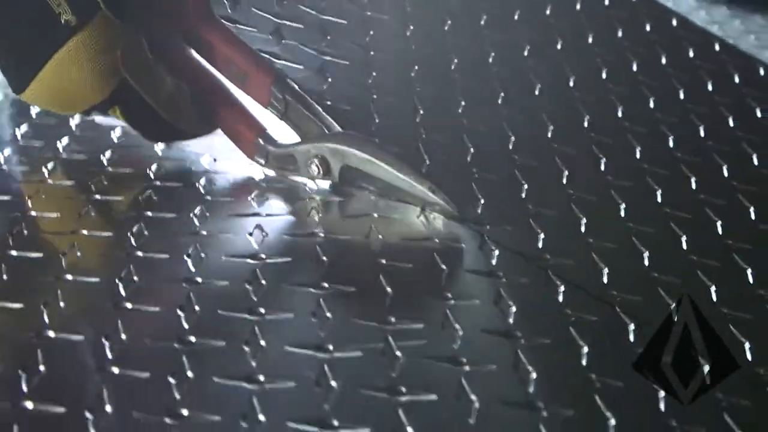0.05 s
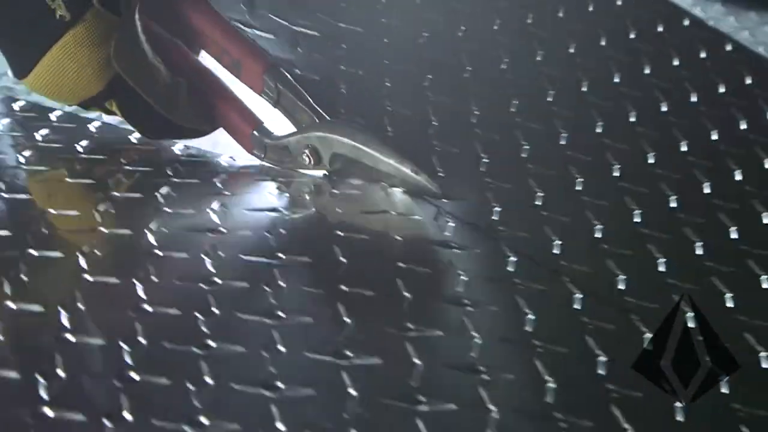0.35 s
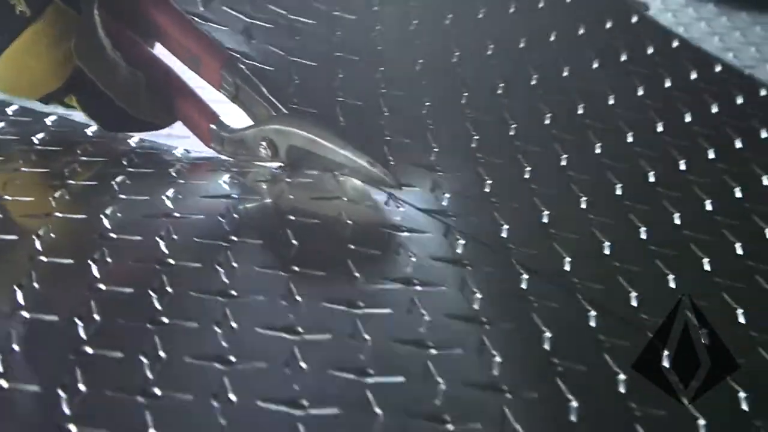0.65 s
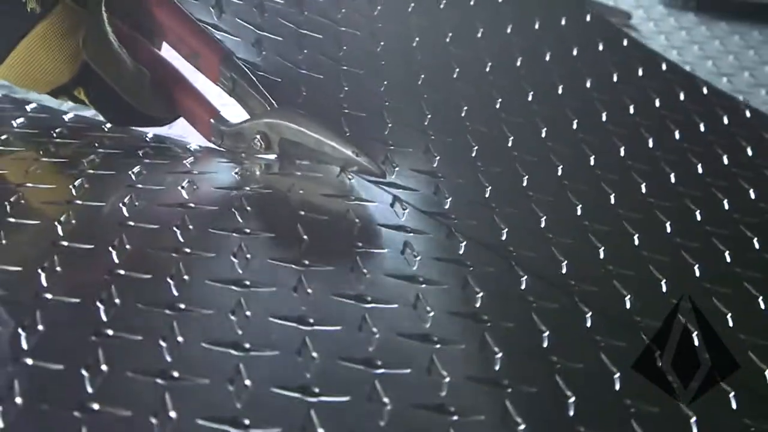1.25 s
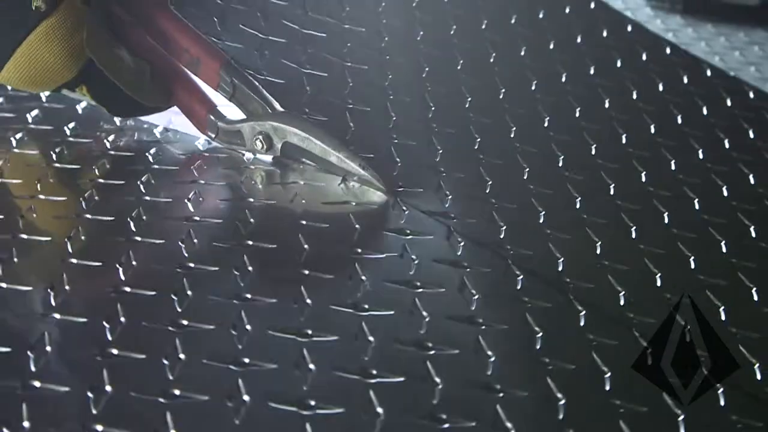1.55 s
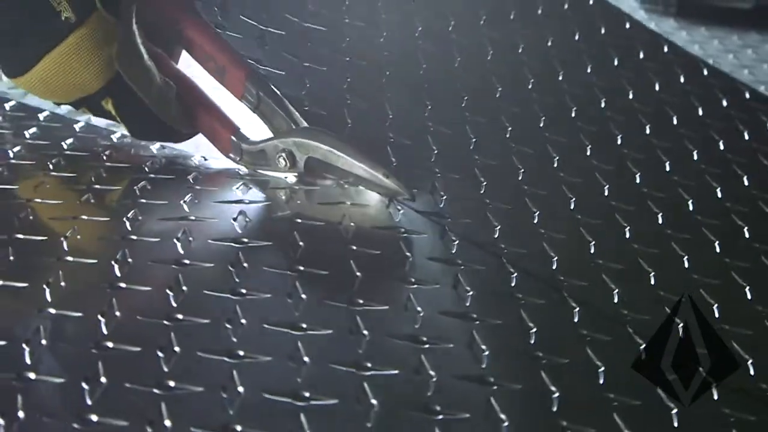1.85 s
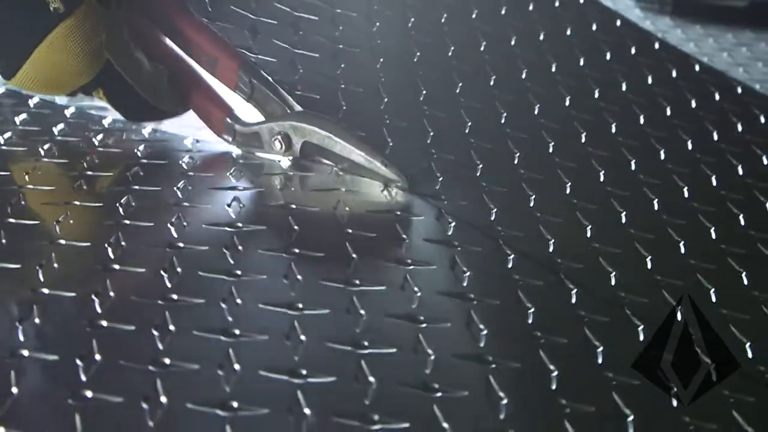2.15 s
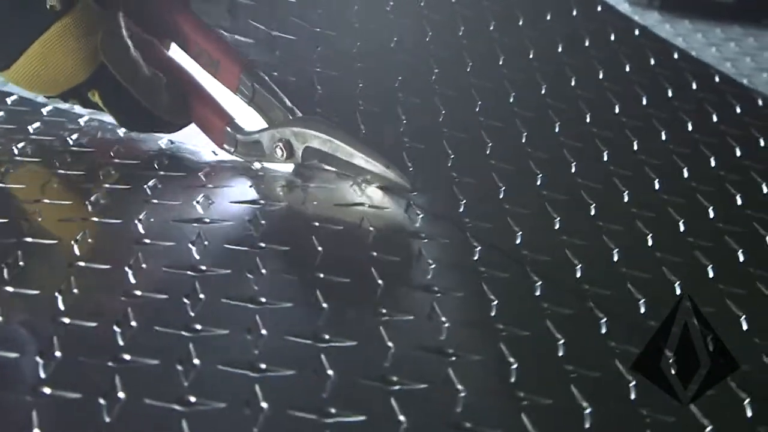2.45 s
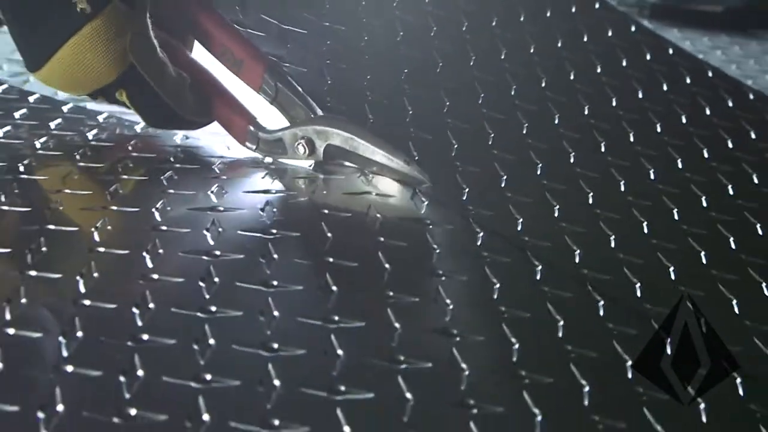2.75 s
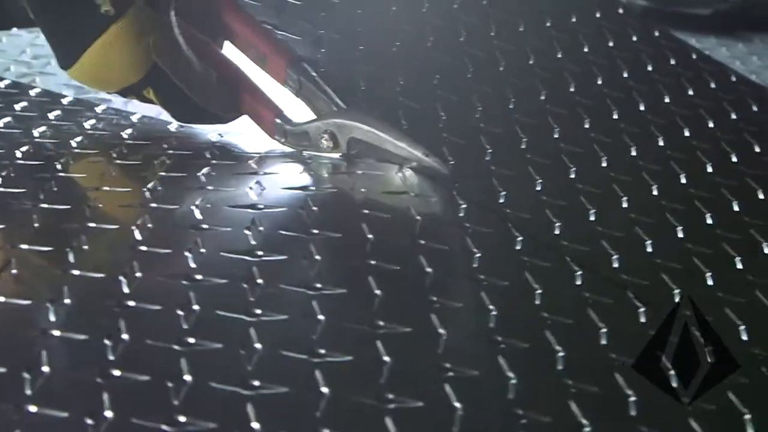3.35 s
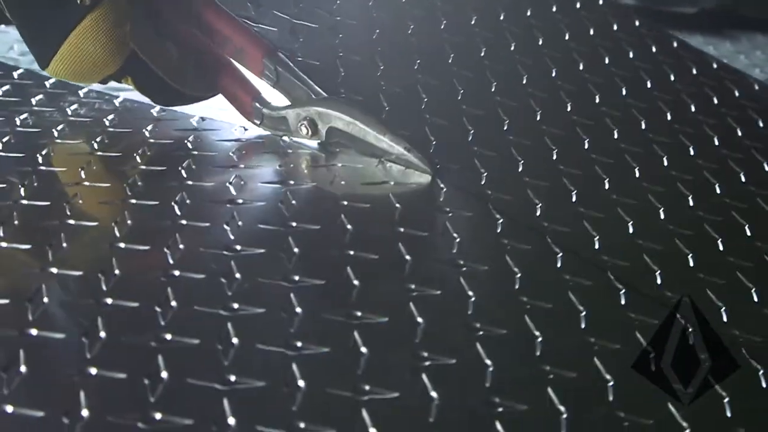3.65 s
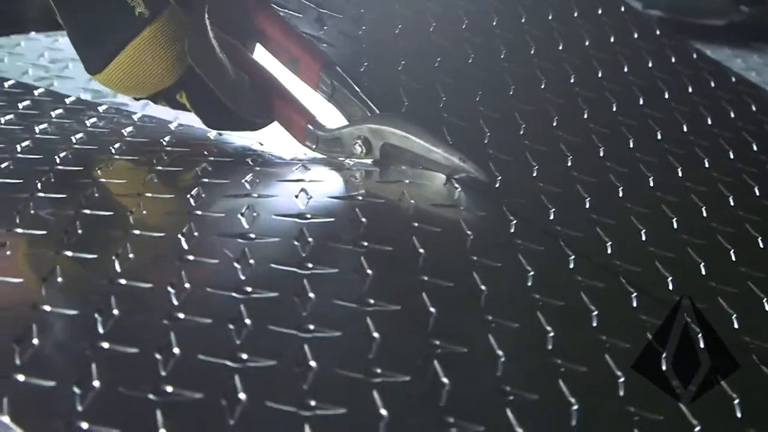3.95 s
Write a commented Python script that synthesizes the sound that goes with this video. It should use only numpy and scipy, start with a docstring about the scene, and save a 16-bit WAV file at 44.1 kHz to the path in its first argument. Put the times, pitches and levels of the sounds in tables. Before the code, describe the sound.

Snips cut thin sheet metal with dull thumps, tinny crashes and short scrapes.

```python
"""Tin snips cutting sheet metal

Close by, snips cut a thin aluminium tread plate. Each bite buckles the sheet with dull thumps, short
tinny crashes and sometimes a clank. Between bites the jaws scrape forward through the slit, and the
cut edge ticks against them. The sheet rings on over a low workshop rumble."""
import sys
import numpy as np
from scipy import signal
from scipy.fft import rfft, irfft, next_fast_len
from scipy.io import wavfile
from scipy.ndimage import uniform_filter1d, map_coordinates

SR = 44100
rng = np.random.default_rng(int(sys.argv[2]) if len(sys.argv) > 2 else 0)


def wav_record(signal):
    """Record a signal, one row per channel, as 16-bit PCM in the file named by sys.argv[1]."""
    frames = np.transpose(np.atleast_2d(signal))
    bounded = np.clip(frames, -1, 1)
    # unit amplitude maps onto the largest positive 16-bit level
    quanta = np.round(bounded * 32767).astype(np.int16)
    wavfile.write(sys.argv[1], SR, quanta)


N = 176400  # 4 seconds

# A "colour" says how strong the lows and highs are. A "fade" is the time taken to drop by 60 dB.
# Stereo is built from "mid" (what both ears share) and "side" (how they differ).
# how wide the noises sound (frequency [Hz], side level [dB])
STEREO_WIDTH = [(60, -25), (300, -130.5), (700, -37), (1400, -25), (2800, -11.5), (5500, -3), (11000, -1)]
# colour of the workshop rumble (frequency [Hz], level [dB])
RUMBLE_COLOUR = [(25, -18), (49, -26), (107, -6.5), (193, -20.5), (305, -4), (631, -21.5), (850, -23),
                 (1300, -30.5), (3530, -37), (5010, -41), (15500, -46.5)]
# clear notes of the ringing sheet (pitch [Hz], relative level [dB], fade [s])
RING_NOTES = [(99.4, -2, .9), (324.8, -1, 0.2), (399, -11.5, 0.57), (807, 3, 0.3), (1187, -1, 0.47),
              (1443, -1, 0.44), (1500, -5, 0.38)]
# how long the wash, a blur of the sheet's weak notes, lasts (frequency [Hz], fade [s])
WASH_FADES = [(100, 0.73), (320, 0.43), (800, 0.28), (2000, 0.22), (3700, 0.38), (6000, 0.085),
              (14000, .15)]
# colour of that wash (frequency [Hz], level [dB])
WASH_COLOUR = [(80, -5), (200, 0.5), (320, -14), (630, -5), (800, -6), (2000, -1), (2900, -12),
               (3700, -1.5), (4600, -11.5), (6200, -3), (14000, -16)]
# ticks of the cut edge on the jaws, and sharp clicks that open the bites at 1.407 and 1.642 s (time [s], level
# [dB])
TICKS = [(0.7774, -25.5), (0.9837, -29.5), (0.988, -26.5), (1.4073, -28.5), (1.6417, -26.5), (1.7608, -29),
         (2.212, -29), (2.276, -32), (2.345, -37), (2.5192, -27.5), (2.5255, -28), (2.6336, -33.5),
         (2.686, -30.5), (3.2394, -24.5), (3.2437, -18.5), (3.347, -38), (3.43, -27), (3.6092, -23)]
# colour of a tick (frequency [Hz], level [dB])
TICK_COLOUR = [(500, 17), (2000, 4.5), (3500, 8), (7000, 1), (11000, -3), (16000, -6)]
# swells of noise: scrapes through the slit and the sheet's bright ringing tails (start [s], rise [s],
# hold [s], time to drop 20 dB [s], boom [dB], rasp [dB], hiss [dB], top of the hiss [Hz])
SWELLS = [(0.339, 0.044, 0.034, 0.029, -16.5, -22.5, -39, 14000),
          (0.577, .004, 0.026, 0.3, -32, -31, -47.5, 7960),
          (0.763, 0.016, 0.017, 0.03, -16.5, -20.5, -37.5, 9300),
          (0.814, 0.027, 0.024, 0.21, -31.5, -45.5, -44, 6750),
          (0.985, 0.064, 0.049, 0.031, -17, -26.5, -44, 13900),
          (1.398, 0.054, 0.015, 0.17, -27, -31, -44, 7600),
          (1.643, 0.0051, 0.049, 0.011, -45, -25, -51, 4280),
          (1.693, 0.019, 0.05, 0.082, -21, -27, -40.5, 14000),
          (1.938, 0.036, 0.029, 0.055, -32, -37.5, -72, 3970),
          (2.204, 0.012, 0.012, 0.18, -16.5, -24.5, -45.5, 9300),
          (2.419, 0.036, 0.048, 0.024, -15, -26.5, -41, 15200),
          (2.583, 0.022, 0.03, 0.043, -31.5, -31, -63, 8000),
          (2.816, 0.023, 0.011, 0.058, -25.5, -30.5, -58, 5900),
          (2.92, 0.0092, 0.073, 0.085, -41, -38.5, -58, 7000),
          (3.149, 0.062, 0.032, 0.12, -22.5, -27, -41, 15000),
          (3.464, 0.005, 0.012, 0.03, -26, -42, -32, 2930),
          (3.57, 0.019, 0.048, 0.068, -22.5, -28, -49.5, 10100),
          (3.78, 0.052, 0.036, 0.12, -17, -25.5, -44, 14000)]
# colours of a swell's low boom, middle rasp and high hiss (frequency [Hz], level [dB])
BOOM_COLOUR = [(40, -55), (90, -27), (115, -20), (150, -31), (210, -22), (265, -0.5), (325, 5.5), (385, -6),
               (520, -17.5), (650, -28), (1500, -55.5)]
RASP_COLOUR = [(200, -51), (400, -1.5), (520, 6.5), (630, -6.5), (720, 5.5), (850, -2), (1050, -5.5),
               (1300, -13), (1600, -15.5), (2100, -21), (3400, -21.5), (5000, -44), (15000, -74)]
HISS_COLOUR = [(800, -5), (2500, 7.5), (3700, 4.5), (4600, 3), (7000, -2), (11000, -3), (16000, -13)]
# clanks of the bent sheet (time [s], pitch [Hz], level [dB], fade [s])
CLANKS = [(0.094, 558, -14, 0.13), (1.055, 730, -12.5, 0.15), (1.646, 1539, -22, 0.3),
          (2.221, 844, -10.5, 0.091), (2.235, 791, -20, 0.34)]
# buckles of the sheet (time [s], thump level [dB], settled pitch [Hz], thump hold [s],
# overtone level [dB], low crash [dB], middle crash [dB], high crash [dB])
BUCKLES = [(0.0921, -5, 309, 0.0096, -19, -12.5, -24, -29.5),
           (0.1223, -9, 300, 0.0055, -14.5, -33, -64, -46),
           (0.608, -5.5, 298, 0.0073, -2.5, -19.5, -30, -34),
           (0.7106, -12.5, 324, 0.0087, -32, -32, -39.5, -36.5),
           (0.7798, -9, 327, .01, -16, -14, -21, -30.5), (0.8007, -10.5, 304, 0.011, -22, -26.5, -58, -61),
           (1.019, -15, 335, 0.012, -29, -19.5, -43, -46), (1.053, -7.5, 327.5, 0.016, -26, -22, -33, -40),
           (1.2243, -4.5, 359.5, 0.0075, -12.5, -22, -34.5, -43),
           (1.407, -5, 348, 0.0087, -17.5, -11.5, -21.5, -27.5),
           (1.4976, -16.5, 283, 0.0081, -34, -25.5, -32.5, -49),
           (1.5278, -16.5, 293, 0.0077, -24, -24, -21.5, -27.5),
           (1.6429, -6.5, 309.4, 0.0079, -11.5, -14.5, -18, -25),
           (1.745, -6.5, 334, 0.0034, -17, -19.5, -51, -44), (1.835, -4, 315, 0.0045, -10, -23, -35, -33.5),
           (2.012, -3, 325, 0.0034, -8.5, -15.5, -28.5, -36.5),
           (2.0943, -22, 362, 0.004, -30, -33, -38.5, -51), (2.1325, -17, 262, 0.0089, -22, -26, -34, -43),
           (2.2041, -2.5, 342, 0.0046, -12.5, -16.5, -23.5, -29),
           (2.2562, -9.5, 279, 0.0077, -35, -30, -50, -36),
           (2.4441, -7, 292.5, 0.017, -24, -34, -29, -31.5), (2.507, -9, 312.5, 0.013, -20, -20, -41, -42),
           (2.5816, -3, 333, 0.0042, -9.5, -21, -36, -43), (2.6046, -14, 310, 0.0061, -14, -32.5, -57, -37),
           (2.6272, -7.5, 341, 0.0046, -10.5, -19, -48, -38),
           (2.8116, -14.5, 337, 0.0087, -24, -39, -40, -50.5),
           (2.865, -4, 292, 0.0066, -15.5, -21.5, -29.5, -40),
           (2.9446, -6, 345, .006, -9.5, -15, -32.5, -29.5), (2.952, -7.5, 277, .011, -16, -28, -35, -52),
           (3.188, -11, 261, 0.0071, -24, -45, -42, -32), (3.4694, -7.5, 304, 0.015, -17, -21, -34, -40),
           (3.5338, -13.5, 286, 0.0073, -20, -19, -31.5, -35),
           (3.5756, -14, 250, 0.0072, -13, -17, -29.5, -33), (3.9417, -16, 303, 0.0083, -40, -45, -57, -69)]
# low, middle and high band of a crash (bottom [Hz], top [Hz], added level [dB], rise [s], fade [s])
CRASH_BANDS = [(499, 1144, -2, 0.0019, 0.12), (1170, 3760, -0.5, 0.00057, 0.11),
               (4000, 12000, -8, 0.005, 0.09)]
# colour of a crash (frequency [Hz], level [dB])
CRASH_COLOUR = [(400, 13.5), (520, 7), (630, -9), (800, 3), (1100, -5.5), (1600, -5.5), (2200, -12),
                (3300, -13.5), (4500, -21.5), (6300, -25), (8000, -30), (15000, -34.5)]


def amp(db):
    """Turn decibels into a number to multiply by."""
    return 10 ** (np.asarray(db) / 20)


def unit(x):
    """Scale a sound to an average strength (rms) of 1."""
    return x / np.sqrt(np.mean(x ** 2) + 1e-20)


def along(points, hz):
    """Read a table between its rows, on a logarithmic frequency scale."""
    frequencies, values = np.transpose(points)
    return np.interp(np.log(hz + 1), np.log(frequencies + 1), values)


def filtered(x, response):
    """Multiply each frequency in a sound by response(frequency)."""
    size = next_fast_len(N + SR // 2)
    return irfft(rfft(x, size) * response(np.fft.rfftfreq(size, 1 / SR)), size)[..., :N]


def coloured(x, colour, low_hz=1, high_hz=SR):
    """Give a mid and side pair a colour and wide highs; the mid comes out at strength 1."""
    def response(hz):
        band = 1 / np.sqrt((1 + (low_hz / (hz + 1)) ** 10) * (1 + (hz / high_hz) ** 10))
        mid_and_side = np.array([np.ones_like(hz), amp(along(STEREO_WIDTH, hz))])
        return amp(along(colour, hz)) * band * mid_and_side
    shaped = filtered(x, response)
    return shaped / shaped[0].std()


def noise():
    """Two unrelated white noises."""
    return rng.standard_normal((2, N))


def wobble(t, per_s):
    """A smooth curve through per_s random values each second."""
    return map_coordinates(rng.standard_normal(N // 10), [t * per_s])


def steadied(x):
    """Even out the chance swells of a noise."""
    return x / np.sqrt(np.abs(uniform_filter1d(x[0] ** 2, size=500)) + 0.3)


def add(track, start, x):
    """Mix x into the track at a start time in seconds."""
    i = max(round(start * SR), 0)
    track[i:i + len(x)] += x[:N - i]


def rumble(level_db=-41.5, side_db=-68.5):
    """The workshop rumbles steadily; a faint extra noise makes it wider."""
    out = amp(level_db) * coloured(noise(), RUMBLE_COLOUR)
    out[1] += amp(side_db) * unit(filtered(noise()[0], lambda hz: 1 / np.sqrt(hz + 20)))
    return out


def sheet_ring(cutting, notes_db=-60.5):
    """Shaken by the cutting, the sheet rings on: a few clear notes in a wash of countless weak ones."""
    hz, times, spectrum = signal.stft(rng.standard_normal((2, SR)), SR, nperseg=512)
    decay = amp(-60 * times / along(WASH_FADES, hz)[:, None])
    energy = SR * np.mean(decay ** 2, axis=1, keepdims=True)
    decay *= amp(along(WASH_COLOUR, hz))[:, None] / np.sqrt(energy)
    wash = signal.istft(spectrum * decay, SR, nperseg=512)[1][:, :SR]
    t = np.arange(SR) / SR
    notes = sum(amp(notes_db + db - 60 * t / fade) * np.sin(2 * np.pi * (pitch * t + rng.random()))
                for pitch, db, fade in RING_NOTES)
    return signal.fftconvolve(cutting, wash + notes, axes=1)[:, :N]


def ticks(rise_s=0.00095, fade_s=0.025):
    """The rough cut edge catches on the blade and lets go; a few sharp clicks also open a bite."""
    t, loudness = np.arange(SR // 10) / SR, np.zeros(N)
    for start, db in TICKS:
        add(loudness, start, amp(db - 60 * t / fade_s) * np.minimum(t / rise_s, 1))
    return loudness * coloured(noise(), TICK_COLOUR)


def slips(per_s=700, spread_db=3, grit=0.46):
    """Metal sticks and slips on metal: many tiny clicks on a bed of noise."""
    slipping = rng.random(N) < per_s / SR
    clicks = slipping * amp(spread_db * rng.standard_normal(N)) * noise()
    return grit * unit(clicks) + (1 - grit) * noise()


def scrapes_and_tails(bend=0.055, chatter_db=1.5):
    """The jaws rub the cut edge with a hiss, rasp and boom; the same noises make bright ringing tails."""
    t, out = np.arange(N) / SR, np.zeros((2, N))
    boom, rasp, hiss = [steadied(coloured(slips(), colour))
                        for colour in (BOOM_COLOUR, RASP_COLOUR, HISS_COLOUR)]
    speed = 1 + bend * wobble(t, per_s=14)  # the sheet flexes, moving the boom's pitch
    boom = np.array([map_coordinates(channel, [np.cumsum(speed)], mode="wrap") for channel in boom])
    for start, rise, hold, release, boom_db, rasp_db, hiss_db, top_hz in SWELLS:
        dying_away = amp(-20 * np.maximum(t - start - rise - hold, 0) / release)
        swell = np.clip((t - start) / rise, 0, 1) * dying_away
        soft_hiss = signal.sosfilt(signal.butter(2, top_hz, fs=SR, output="sos"), hiss)
        out += swell * (amp(boom_db) * boom + amp(rasp_db) * rasp + amp(hiss_db) * soft_hiss)
    return out * amp(chatter_db * wobble(t, per_s=160))  # the jaws move forward unevenly


def clanks(rise_s=0.002, wander_cycles=0.14):
    """The bent sheet sings one short, unsteady note, whose pitch depends on where it is held."""
    t, out = np.arange(SR // 2) / SR, np.zeros((2, N))
    for start, hz, db, fade in CLANKS:
        cycles = hz * t + wander_cycles * wobble(t, per_s=100)
        loudness = amp(db - 60 * t / fade) * (1 - np.exp(-t / rise_s))
        add(out[0], start, loudness * np.sin(2 * np.pi * cycles))
    return out


def thumps(rise_s=0.0023, fade_s=0.032, overtone_ratio=1.606, overtone_fade_s=0.043):
    """The buckling sheet snaps over in a low swing that dies quickly, with one higher note on top."""
    sag, sag_s = 0.21, 0.0031  # the pitch starts 21% high and settles
    t, out = np.arange(SR // 4) / SR, np.zeros((2, N))
    for start, db, hz, hold, overtone_db, *_ in BUCKLES:
        phase = 2 * np.pi * hz * (t + sag * sag_s * (1 - np.exp(-t / sag_s)))
        swing = amp(db - 60 * np.maximum(t - hold, 0) / fade_s) * np.sin(phase)
        overtone = amp(overtone_db - 60 * t / overtone_fade_s) * np.sin(overtone_ratio * phase)
        add(out[0], start, np.minimum(t / rise_s, 1) * (swing + overtone))
    return out


def crashes(lead_in_s=0.0061, lead_in_db=-13.5):
    """Each swing spills upward into a tinny crash, which starts with a faint, brief lead-in of noise."""
    t, out = np.arange(SR // 4) / SR, np.zeros((2, N))
    for band, (low_hz, high_hz, band_db, rise, fade) in enumerate(CRASH_BANDS):
        lead_in = amp(lead_in_db) * (t < lead_in_s + rise) * np.minimum(t / lead_in_s, 1)
        crash = amp(-60 * np.maximum(t - rise, 0) / fade) * np.minimum(t / rise, 1)
        loudness = np.zeros(N)
        for start, _, _, _, _, *crash_db in BUCKLES:
            gain = amp(crash_db[band] + band_db)
            add(loudness, start - lead_in_s, gain * lead_in)
            add(loudness, start, gain * crash)
        out += loudness * steadied(coloured(noise(), CRASH_COLOUR, low_hz, high_hz))
    return out


def scene(left_lag_s=7e-6):
    """Snips and sheet over the workshop rumble, as left and right channels."""
    cutting = thumps() + crashes() + scrapes_and_tails() + ticks()
    mid, side = cutting + clanks() + sheet_ring(cutting) + rumble()
    side -= left_lag_s * SR / 2 * np.gradient(mid)  # the sound reaches the left slightly later
    return np.array([mid + side, mid - side])


def record(dry, limit=0.82, low_cut_hz=38, top_hz=15950):
    """Round off the loudest peaks, thin the deep bass and remove the very highest sounds."""
    rounded = dry / (1 + np.abs(dry / limit) ** 6) ** (1 / 6)
    return filtered(rounded, lambda hz: (hz < top_hz) * hz / np.hypot(hz, low_cut_hz))


dry = scene()
out = record(dry)
wav_record(out)
```